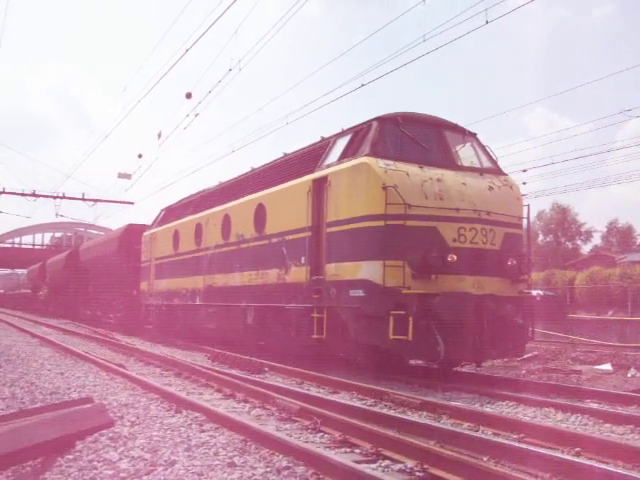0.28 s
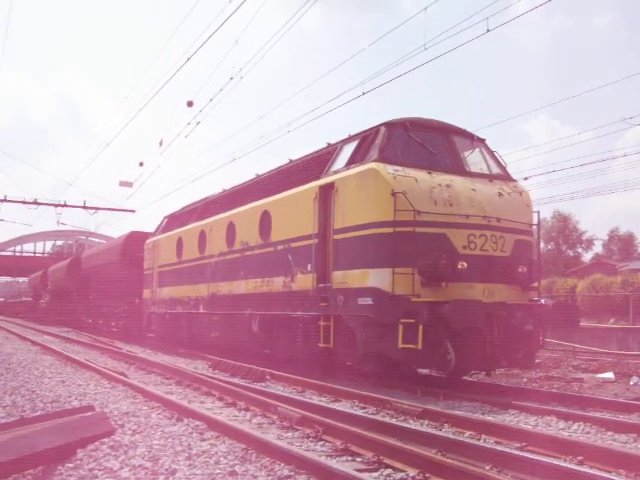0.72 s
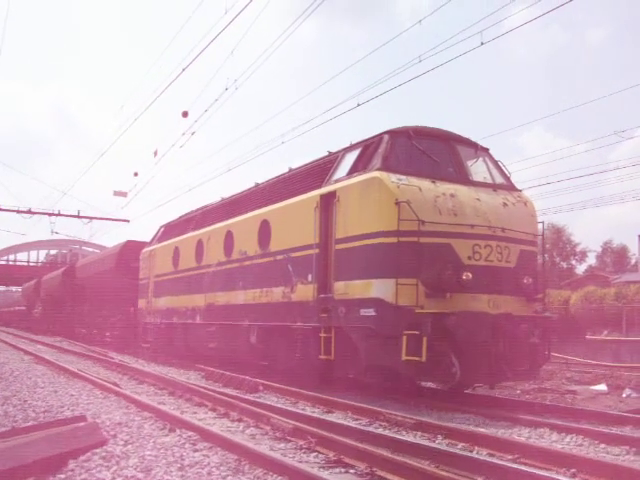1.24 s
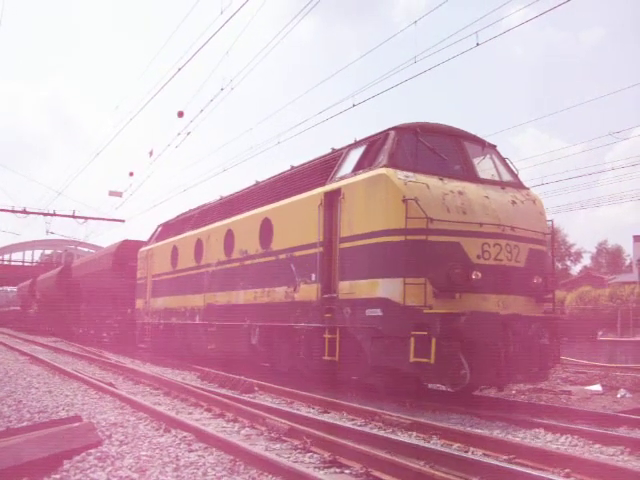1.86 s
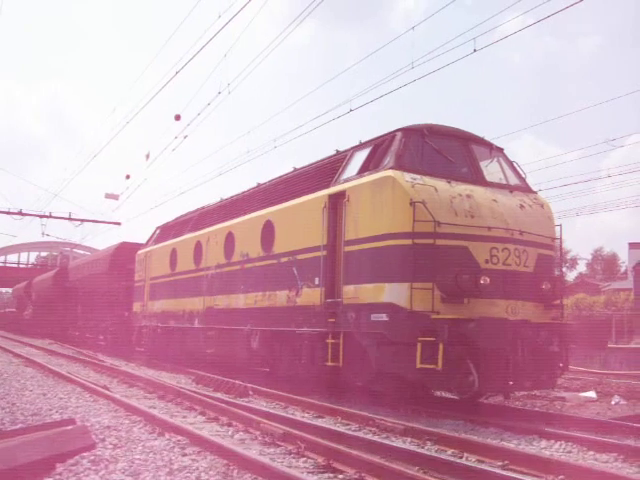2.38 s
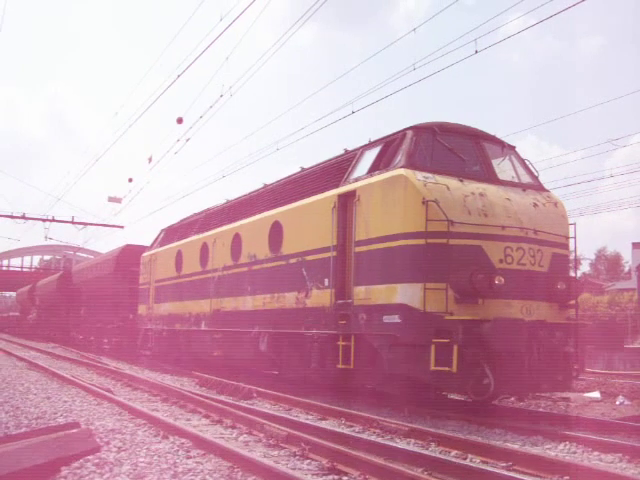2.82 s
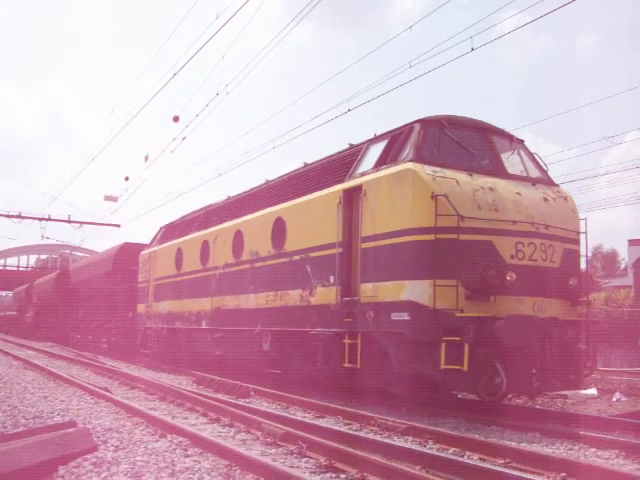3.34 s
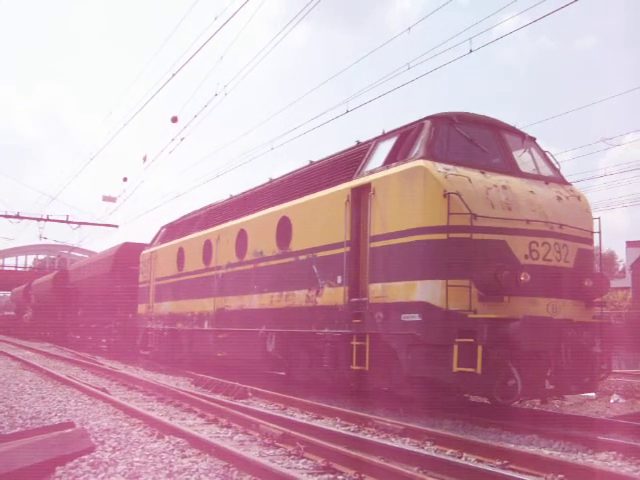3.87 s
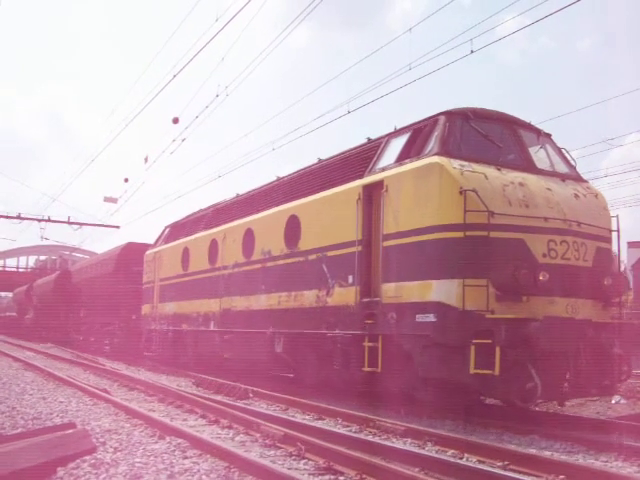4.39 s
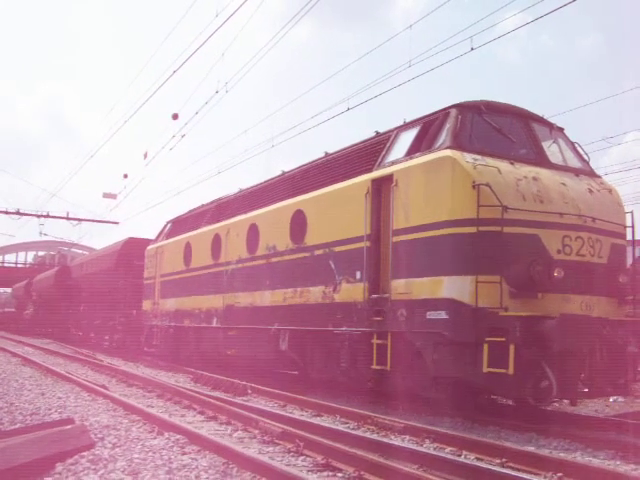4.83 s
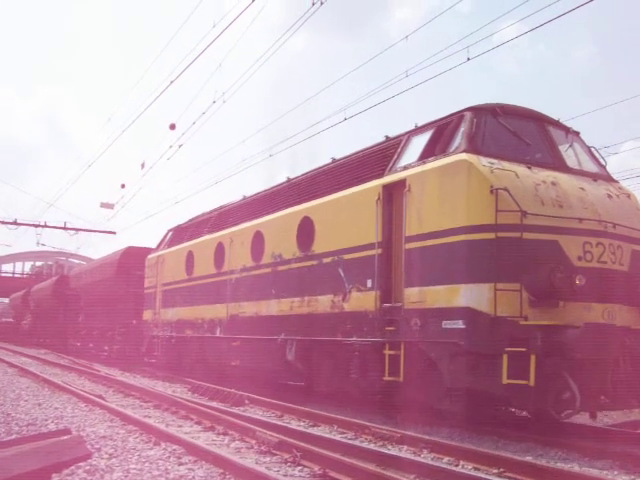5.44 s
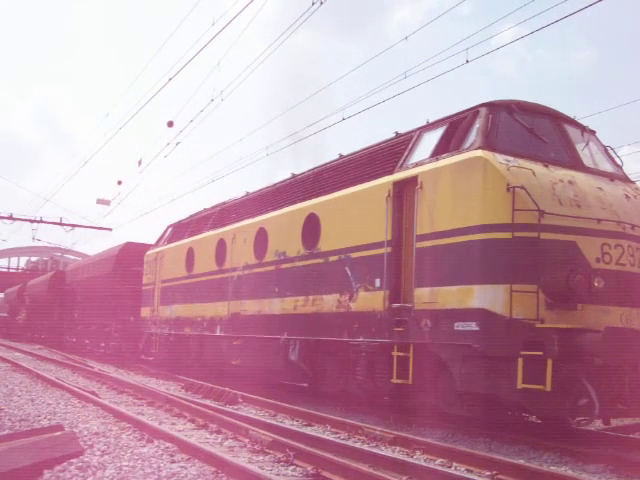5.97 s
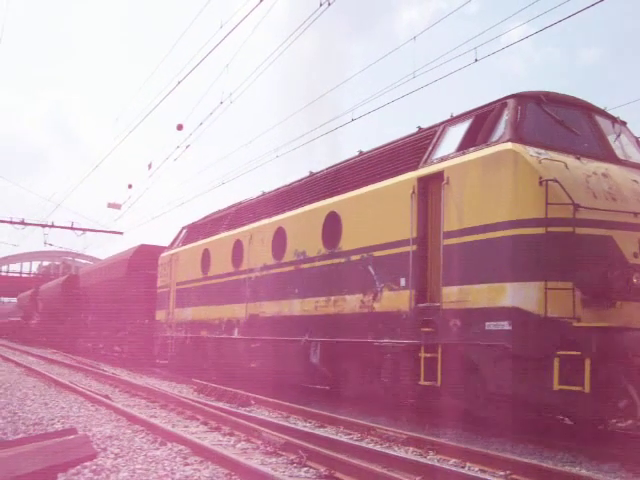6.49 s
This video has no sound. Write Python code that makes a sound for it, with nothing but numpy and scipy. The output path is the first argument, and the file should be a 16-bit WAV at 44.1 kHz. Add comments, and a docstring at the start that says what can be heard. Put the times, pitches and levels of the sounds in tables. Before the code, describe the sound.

A big diesel locomotive creeps past, its throbbing idle holding steady, sagging lower with rattling panels, then gradually climbing back amid hissing blower air.

```python
"""In an open yard, a big two-stroke diesel locomotive idles as it creeps past.
Its speed sags and recovers: the exhaust beat, a near-sine, glides down and up with the crank.
Repeating blows and loose noise ring the fixed resonances of frame and body panels, with a few brief louder
bursts in the panels' roar. Metal clatter, ringing doors and filtered blower noise swell once a turn;
thin whines and a low rumble lie beneath."""
import sys
import numpy as np
from scipy import signal
from scipy.fft import rfft, irfft, next_fast_len
from scipy.io import wavfile
from scipy.ndimage import uniform_filter1d, map_coordinates

SR = 44100
rng = np.random.default_rng(int(sys.argv[2]) if len(sys.argv) > 2 else 0)


def undo_db(level):
    """Turn decibels back into plain size, where 20 dB means ten times bigger."""
    steps = np.asarray(level, float) / 20
    return 10 ** steps


def log_audio(samples):
    """Write samples as a 16-bit WAV file to the path given in sys.argv[1]."""
    # one column per channel
    frames = np.atleast_2d(samples).T
    # limit to full scale, then quantise
    limited = np.clip(frames, -1, 1)
    pcm = np.round(limited * 32767).astype(np.int16)
    wavfile.write(sys.argv[1], SR, pcm)


N = 296352  # length in samples

# the uneven exhaust beats of one crank turn, before scaling by speed: strength_db, delay_degrees (of the crank)
BEATS = [(4.0, -2.8), (-1.1, -2.7), (0.8, -3.7), (2.0, -2.6), (-0.1, -1.1), (-2.2, -1.2), (-4.9, -3.7),
         (-2.9, -4.4), (1.8, -3.4)]
CHUG_DB = 4  # how far rattle and howl pulse with the exhaust beat


def unit(x):
    """Scales a sound to an average (rms) strength of one."""
    return x / np.sqrt(np.mean(x ** 2) + 1e-20)


def curves(rows):
    """One value per sample for each column after the time."""
    s, *cols = np.transpose(rows)
    return [np.interp(np.arange(N) / SR, s, c) for c in cols]


def wobble(rate):
    """A smooth random curve with rate random points a second."""
    coarse = np.arange(0, N + 16, 16)
    points = rng.standard_normal(int(N * rate / SR) + 4)
    return np.interp(np.arange(N), coarse, map_coordinates(points, [coarse * rate / SR]))


def filtered(x, response):
    """Shapes x by a complex response of frequency, then scales it to unit strength."""
    m = next_fast_len(N + SR // 2)  # spare room for the ringing to die away
    spectrum = rfft(x, m) * response(np.fft.rfftfreq(m, 1 / SR))
    return unit(irfft(spectrum, m)[:N])


def colour(points):
    """A tone colour: gain drawn through (Hz, dB) points on a log frequency axis."""
    f, db = np.transpose(points)
    return lambda hz: undo_db(np.interp(np.log(hz + 1), np.log(f + 1), db))


def resonant(modes):
    """A sum of resonances (Hz, width Hz, dB) of alternating sign, each ringing after a blow."""
    def response(f):
        total = 0
        for k, (centre, width, db) in enumerate(modes):
            total = total + (-1) ** k * undo_db(db) * 1j * f * width / (centre ** 2 - f ** 2 + 1j * f * width)
        return total
    return response


def patchy(depth_db):
    """White noise with patches of random gain in time and frequency."""
    z = signal.stft(rng.standard_normal(N), nperseg=512)[2]
    field = uniform_filter1d(rng.standard_normal(z.shape), size=6, axis=0)
    field = uniform_filter1d(field, size=10, axis=1)
    return signal.istft(z * undo_db(depth_db * unit(field)), nperseg=512)[1][:N]


def beat_wave(turns, drift=0):
    """A cosine at the exhaust beat rate; drift shifts its phase in radians."""
    return np.cos(2 * np.pi * len(BEATS) * turns + drift)


def exhaust(turns, rpm):
    """A near-sine at the beat rate; each beat has its own strength and delay, more uneven at speed."""
    # the beat's level and unevenness change, abruptly in the sag and again as speed recovers:
    # start_s, level_db, unevenness_db (at 380 rpm)
    beat_changes = [(0, -21, 2), (1.89, -21, -1.5), (2.28, -27, -0.5), (2.32, -30, -1), (2.37, -23, -2),
                    (2.51, -23.5, 1), (2.64, -25, 1.5), (2.69, -20.5, -4), (2.81, -34, 3.5),
                    (2.85, -24, 0.5), (2.98, -31, 0.5), (3.07, -27, 0.5), (3.6, -23.5, 1.5),
                    (4.23, -23.5, -1), (4.81, -28, 3.5), (5.2, -25, 3), (5.3, -23.5, 3), (5.52, -21.5, -2),
                    (5.8, -24, 3), (6.0, -23, 4.5), (6.72, -20, 0)]
    exhaust_db, uneven_db = curves(beat_changes)
    db, delay = np.transpose(BEATS)
    count = len(BEATS)
    beats = undo_db(db) * np.exp(-1j * count * np.radians(delay))
    lines = np.fft.fft(beats) / count  # the unevenness shows as neighbouring crank orders
    offset = np.fft.fftfreq(count, 1 / count)
    uneven = undo_db(uneven_db) * (rpm / 380) ** 2
    pattern = 0
    for k, line in zip(offset, lines):
        # orders above the beat are muffled
        strength = uneven * undo_db(wobble(2) - 1.3 * max(k, 0)) if k else 1
        pattern = pattern + line * strength * np.exp(2j * np.pi * k * turns)
    beat = (pattern * np.exp(2j * np.pi * count * turns)).real * undo_db(0.38 * wobble(8.7))
    flutter = undo_db(-21) * np.cos(2 * np.pi * count / 3 * turns)  # the stack's slow flutter
    return undo_db(exhaust_db) * unit(beat + flutter)


def per_turn(turns, table):
    """A table of one crank turn, read smoothly at the crank angle."""
    return map_coordinates(table, [turns % 1 * len(table)], mode="grid-wrap")


def firing(turns, strong):
    """The blows of one turn, much the same each turn: a heavy and a weaker one, higher orders more spread."""
    second_turns, second_strength = 2 / 7, .7  # the weaker blow follows the heavy one
    order = np.arange(129)  # multiples of the crank rate
    size_db, scatter = rng.normal(-3, 2, len(order)), rng.uniform(-1, 1, len(order))
    for k, db in strong:
        size_db[k] = db
    spread = np.interp(order, [32, 50], [.05, .42])  # in turns of phase
    pair = 1 + second_strength * np.exp(-2j * np.pi * second_turns * order)
    timing = np.exp(-2j * np.pi * (.28 * order + spread * scatter))
    lines = undo_db(size_db) * pair / np.abs(pair) * timing  # the pair sets phases only
    lines[:12] = 0
    blows = per_turn(turns + .0004 * wobble(3), irfft(lines, 4096))
    return undo_db(.8 * wobble(9)) * blows


def rung(blows, modes, loose_db, steep, gate_db=0):
    """Repeating blows and a looser noise that never repeats ring the same resonances."""
    ring = resonant(modes)
    body = lambda hz: ring(hz) * np.abs(ring(hz)) ** steep * (hz < 950)  # steep sharpens the peaks
    loose = undo_db(loose_db) * filtered(undo_db(gate_db) * rng.standard_normal(N), body)
    return (filtered(blows, body) + loose) / np.sqrt(1 + undo_db(2 * loose_db))


def quiet(x):
    """The frame is quiet between its two lowest resonances: a notch at 104 Hz, 24 Hz wide."""
    return filtered(x, lambda hz: 1 - .75 * resonant([(104, 24, 0)])(hz))


def block(turns):
    """Frame and panels, both rung by the firing; the panels rattle more loosely, in chugs."""
    # crank orders that stand out, as the frame and the panels feel them: crank_multiple, strength_db
    frame_orders = [(12, 9), (13, 1), (14, 8), (15, 10), (16, 11), (17, 12), (18, 10), (24, 13), (27, 3),
                    (28, 8), (29, 4.5), (30, -3), (31, 8.5), (37, 3), (40, 7), (41, 3), (42, 3), (43, 5),
                    (45, 6), (48, 13)]
    panel_orders = [(45, 5), (47, 4), (51, 3), (54, 5), (57, 3), (63, 3), (66, 2), (71, 6), (74, 3),
                    (75, 3), (76, 3), (79, 5), (96, 4), (104, 4), (113, 9)]
    # resonances of frame and body panels, before sharpening: pitch_hz, width_hz, strength_db
    frame_modes = [(74, 20, -4), (123.6, 24.5, -1), (161, 113, -4.5), (206, 33, 4.5), (233.5, 19, 1),
                   (251.8, 14, 0)]
    panel_modes = [(300.3, 47, -7), (344.6, 25.4, -4.5), (387.7, 33.4, -4), (440.4, 24.6, -3),
                   (485, 21.5, 0), (529.3, 16.7, -0.5), (552.5, 28.7, -1.5), (682.5, 142, -7),
                   (818, 49, -7)]
    # the loose rattle grows once the speed leaves its steady state (the frame takes half): start_s, growth_db
    loose_growth = [(0, 0), (1.2, 2), (2.0, 7), (3.2, 7), (3.8, 3), (4.6, 6), (6.72, 5)]
    loose_db, = curves(loose_growth)
    chug_db = CHUG_DB * beat_wave(turns, wobble(4))
    frame = rung(firing(turns, frame_orders), frame_modes, -14 + .5 * loose_db, steep=1.0)
    panels = rung(firing(turns, panel_orders), panel_modes, -5.5 + loose_db, steep=0.22, gate_db=chug_db)
    return quiet(frame), panels


def sag(rpm, lag_s):
    """Speed lost per second in hundreds of rpm, felt gradually and late."""
    smooth_s = 0.56
    t = np.arange(N) / SR
    lost = np.clip(-np.gradient(rpm) * SR / 100, 0, None)
    return np.interp(t - lag_s, t, uniform_filter1d(lost, size=int(smooth_s * SR)))


def levels(rpm):
    """dB of thump, roar, clatter, blower and top hiss, from the sag of speed and the passing grilles."""
    # the frame's thump, its own level before the sag adds to it: start_s, level_db
    thump_base = [(0, -27), (1.9, -28), (2.3, -25), (2.6, -25.5), (3.2, -26.5), (4.5, -29), (5.0, -29.5),
                  (6.2, -31.5), (6.72, -28.5)]
    # the panels' roar, its own level before the sag adds to it: start_s, level_db
    roar_base = [(0, -23.5), (1.0, -24.5), (2.0, -23.5), (2.5, -24.5), (3.0, -23), (3.5, -24), (4.1, -25),
                 (4.6, -24.5), (5.2, -25.5), (5.8, -27), (6.2, -25.5), (6.72, -25.5)]
    # the blower as the intake grilles draw abreast and pass: start_s, level_db (before the sag)
    grille_pass = [(0, -27), (1.3, -26), (2.6, -30), (3.1, -25), (3.8, -24), (4.9, -22.5), (5.5, -24.5),
                   (6.0, -23.5), (6.72, -27.5)]
    # top hiss over its usual level: start_s, lift_db
    top_lift = [(0, 1), (3.0, -1.5), (4.0, -1), (4.8, -0.5), (5.6, 0), (6.72, 2.5)]
    now, late = sag(rpm, lag_s=0.039), sag(rpm, lag_s=0.3)  # panels and clatter feel the sag last
    # the unloaded engine shakes and the blower starves: dB per 100 rpm lost a second
    thump_db = curves(thump_base)[0] + 1.5 * now
    roar_db = curves(roar_base)[0] + 2 * late
    clatter_db = -31 + 3 * late
    blower_db = curves(grille_pass)[0] - 4.5 * now
    # the top hiss swings wider than the blower
    top_db = -49 + 1.9 * (blower_db - np.mean(grille_pass, axis=0)[1]) + curves(top_lift)[0]
    return thump_db, roar_db, clatter_db, blower_db, top_db


def howl(turns):
    """Chugging noise in the panels' strongest resonances, in the sag and on the recovery."""
    # start_s, upper_rings_db, lower_ring_db
    howl_levels = [(0, -46, -49), (1.7, -39.5, -40), (2.0, -34, -42), (2.3, -26.5, -34.5), (2.65, -21, -39),
                   (3.0, -37, -30.5), (3.25, -27, -35), (3.5, -39, -44.5), (5.1, -39, -47), (5.5, -34, -33),
                   (5.9, -36.5, -42), (6.15, -27.5, -42), (6.55, -34.5, -46), (6.72, -34, -45)]
    chugs = undo_db(CHUG_DB * beat_wave(turns) + 3.0 * wobble(13)) * rng.standard_normal(N)
    upper_db, lower_db = curves(howl_levels)
    upper = filtered(chugs, lambda hz: resonant([(480, 35, 0), (520, 25, -2), (555, 30, 0)])(hz) ** 2)
    lower = filtered(chugs, lambda hz: resonant([(397, 25, 0)])(hz) ** 2)
    return undo_db(upper_db) * upper + undo_db(lower_db) * lower


def bursts():
    """A few brief louder bursts in the panels' roar: single impulses through a broad resonance."""
    # start_s, peak_db
    burst_peaks = [(1.899, -12.5), (2.409, -9.5), (2.802, -14.5), (2.949, -13), (3.294, -13.5)]
    s, db = np.transpose(burst_peaks)
    impulses = np.zeros(N)
    impulses[(s * SR).astype(int)] = undo_db(db)
    rings = filtered(impulses, lambda hz: resonant([(500, 220, 0)])(hz) ** 3)
    return rings * undo_db(db.max()) / np.abs(rings).max()


def clatter():
    """Valve gear: dense noise for small metal impacts of uneven size, ringing covers and side doors."""
    # resonances of the covers: pitch_hz, width_hz, strength_db
    cover_modes = [(1096, 210, -14.5), (1165, 50, -9.5), (1650, 81, -12), (2130, 230, -7.5),
                   (3550, 500, -4.5)]
    # tone colour of the impacts: pitch_hz, gain_db
    impact_colour = [(500, -16.5), (850, 7), (2600, -4), (4000, -9.5), (5200, -12), (7400, -20),
                     (8750, -43.5), (9300, -75.5)]
    taps = patchy(depth_db=0.8) * undo_db(1.2 * wobble(400))
    return filtered(taps, lambda hz: (.25 + np.abs(resonant(cover_modes)(hz))) * colour(impact_colour)(hz))


def doors():
    """Noise ringing narrowly in each side door, heard as that door comes abreast."""
    # rings, before they are narrowed by squaring: pitch_hz, width_hz
    door_rings = [(2050, 200), (2200, 150), (3490, 190), (3700, 200), (4500, 250)]
    # start_s, then one level_db for each ring in turn (before the once-a-turn swell)
    door_levels = [(0, -57, -48, -47, -39, -48), (0.7, -54, -47, -50, -36, -43),
                   (1.0, -54, -46, -48, -39, -45.5), (1.35, -49, -45.5, -43, -32.5, -43.5),
                   (2.2, -45.5, -40.5, -51, -50, -52), (2.9, -47, -37.5, -40.5, -40.5, -45),
                   (3.5, -52.5, -38.5, -39.5, -32.5, -39), (4.1, -37, -45, -46, -42, -40),
                   (5.0, -35, -39.5, -44, -46, -41.5), (6.0, -42.5, -43, -41.5, -44, -46),
                   (6.72, -45.5, -55, -45, -46, -48)]
    total = 0
    for (hz, width), db in zip(door_rings, curves(door_levels)):
        ring = filtered(rng.standard_normal(N), lambda f: resonant([(hz, width, 0)])(f) ** 2)
        total = total + undo_db(db + wobble(5)) * ring
    return total


def blower():
    """Air rushing through blower and intake grilles: noise, slightly gritty, coloured by the duct."""
    # tone colour of the rush: pitch_hz, gain_db
    rush_colour = [(900, -36.5), (1400, -6), (1830, -8.5), (2050, -7.5), (2400, -6.5), (3100, -3.5),
                   (4600, -4.5), (5900, -16), (7000, -24.5), (8750, -50.5), (9300, -100)]
    # resonances of the blower duct: pitch_hz, width_hz, strength_db
    duct_modes = [(2050, 140, -9.5), (3820, 160, -12)]
    air = patchy(depth_db=0.54) * undo_db(0.94 * wobble(300))
    return filtered(air, lambda hz: (1 + np.abs(resonant(duct_modes)(hz))) * colour(rush_colour)(hz))


def breathing(turns):
    """The once-a-turn swell of the hiss by a changing amount, and the top hiss's deeper puffs, in dB."""
    # start_s, depth_db, peak_turns (place of the peak within the turn)
    breath = [(0, 0.9, 0.96), (2.5, 1, 0.99), (5.0, 0, 0.35), (5.7, 0.93, 0.84), (6.72, 1, 0.93)]
    depth_db, peak = curves(breath)
    angle = 2 * np.pi * (turns - peak)
    swell = depth_db * (1 + .4 * wobble(3)) * np.cos(angle) + .35 * wobble(9)
    puff = 1.4 * swell + 2 * depth_db * np.exp(3 * (np.cos(angle) - 1))  # a short puff on each swell
    return swell, puff


def top_hiss():
    """The highest hiss: patchy noise in the treble."""
    # tone colour: pitch_hz, gain_db
    top_colour = [(4500, -21.5), (5600, -3), (7000, 0.5), (7900, -9), (8750, -27), (9200, -77.5)]
    return filtered(patchy(depth_db=1.3), colour(top_colour))


def gears(turns, rpm):
    """Thin wavering whines that die away as the engine slows and their housing slides past."""
    # auxiliary gears: crank_multiple, level_db (at 442 rpm, at the start)
    gear_whines = [(157.9, -43), (226.1, -40.5)]
    fade_db = .25 * (rpm - 442) - 3 * np.arange(N) / SR
    total = 0
    for k, db in gear_whines:
        tone = np.sin(2 * np.pi * k * turns + 0.57 * wobble(4.7))
        total = total + undo_db(db + fade_db + 5.8 * wobble(2.9)) * tone
    return total


def whine():
    """A thin tone around a fixed pitch, slightly unsteady."""
    # start_s, level_db
    whine_level = [(0, -35), (0.45, -29), (1.0, -36), (1.3, -47), (6.1, -38.5), (6.35, -32.5), (6.72, -34)]
    pitch_hz = 786
    tone = np.sin(2 * np.pi * pitch_hz * np.arange(N) / SR + .4 * wobble(7))
    return undo_db(curves(whine_level)[0] + wobble(4)) * tone


def rumble():
    """Low noise of yard and wheels."""
    # tone colour: pitch_hz, gain_db
    rumble_colour = [(8, -16.5), (25, -9), (50, -16), (100, -11.5), (160, 8), (400, -21.5), (900, -11),
                     (1500, -50)]
    # start_s, level_db
    rumble_level = [(0, -36.5), (1.4, -35.5), (2.0, -33), (2.7, -34.5), (3.6, -36.5), (4.4, -34.5),
                    (5.2, -35), (6.0, -31.5), (6.72, -35)]
    level_db = curves(rumble_level)[0] + .5 * wobble(2)
    return undo_db(level_db) * filtered(rng.standard_normal(N), colour(rumble_colour))


def scene():
    """All the engine's turning parts follow one crank angle."""
    # engine speed: start_s, speed_rpm (crankshaft turns per minute)
    crank_speed = [(0.0, 441.2), (1.3, 441.0), (1.6, 437.2), (1.9, 423.2), (2.2, 394.0), (2.8, 340.0),
                   (3.1, 317.4), (3.4, 308.8), (3.7, 302.3), (4.0, 303.8), (4.3, 308.0), (4.6, 321.1),
                   (5.5, 360.3), (5.8, 379.6), (6.1, 393.1), (6.4, 401.1), (6.72, 403.7)]
    rpm, = curves(crank_speed)
    turns = np.cumsum(rpm) / 60 / SR
    thump_db, roar_db, clatter_db, blower_db, top_db = levels(rpm)
    thump, roar = block(turns)
    swell, puff = breathing(turns)
    low = exhaust(turns, rpm) + undo_db(thump_db) * thump + undo_db(roar_db) * roar
    flutter_db = 1.5 * beat_wave(turns)  # the clatter flutters at the beat rate
    metal = undo_db(clatter_db + 0.18 * swell + flutter_db) * clatter() + undo_db(swell) * doors()
    air = undo_db(blower_db + swell) * blower() + undo_db(top_db + puff) * top_hiss()
    tones = gears(turns, rpm) + whine()
    return (low + howl(turns) + bursts() + metal + air + tones + rumble())[None]


def top_cut(x):
    """Nothing passes above the cut-off."""
    return signal.sosfilt(signal.butter(12, 8900, fs=SR, output="sos"), x)


def record(dry):
    """Passes on the finished mono mix."""
    return top_cut(dry)


dry = scene()
out = record(dry)
log_audio(out)
```